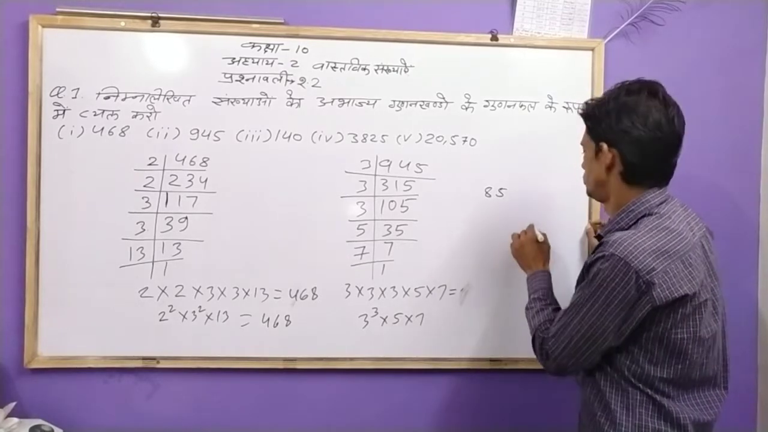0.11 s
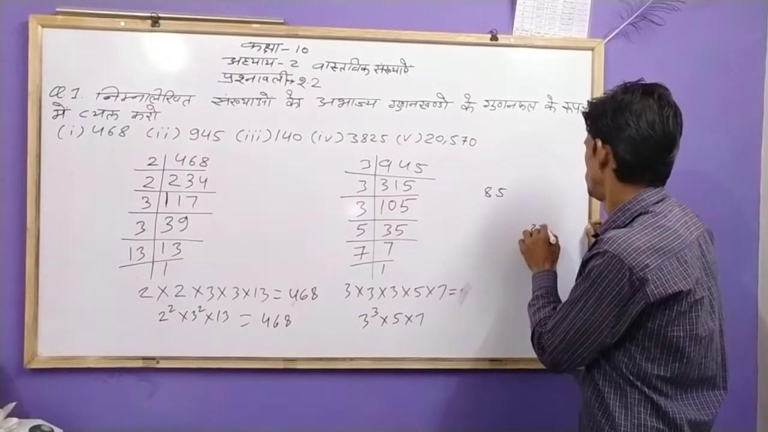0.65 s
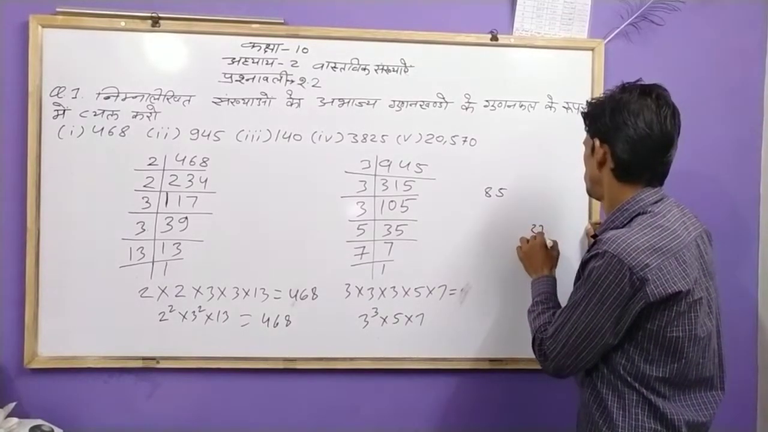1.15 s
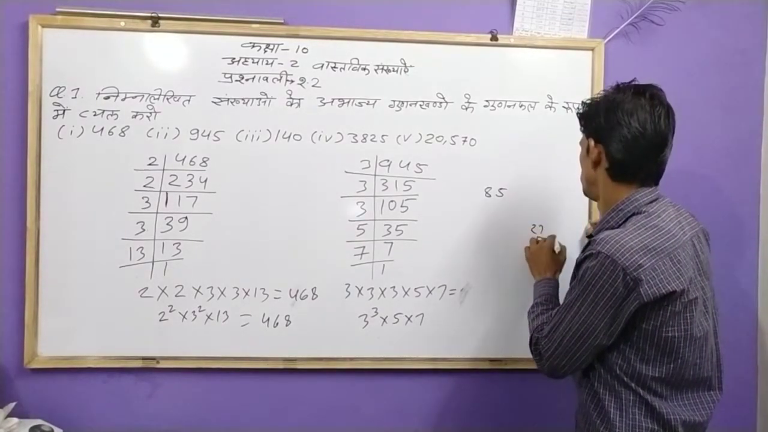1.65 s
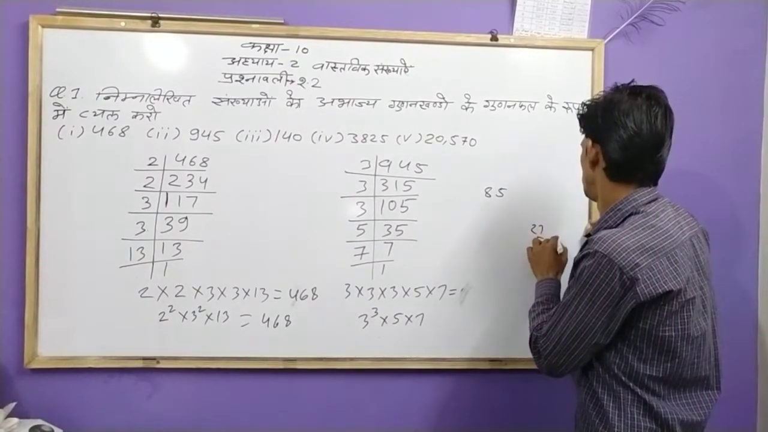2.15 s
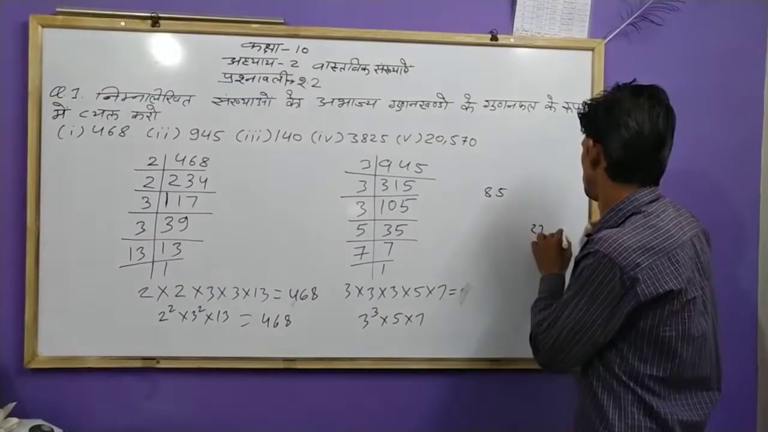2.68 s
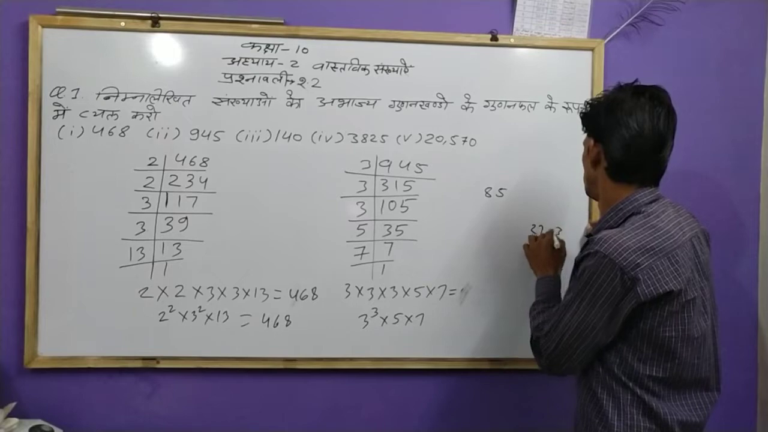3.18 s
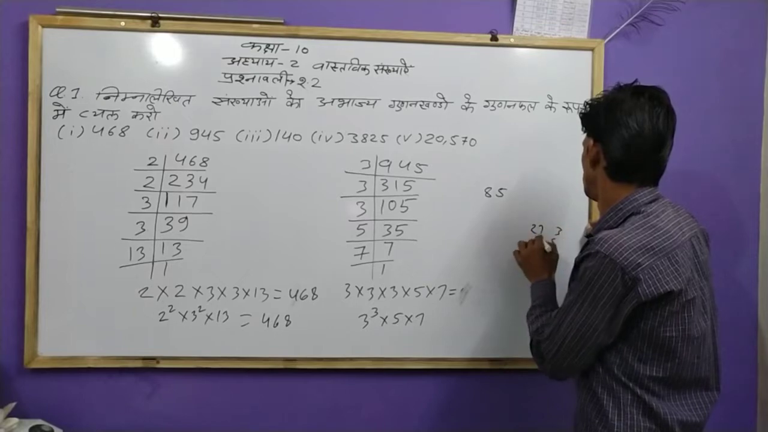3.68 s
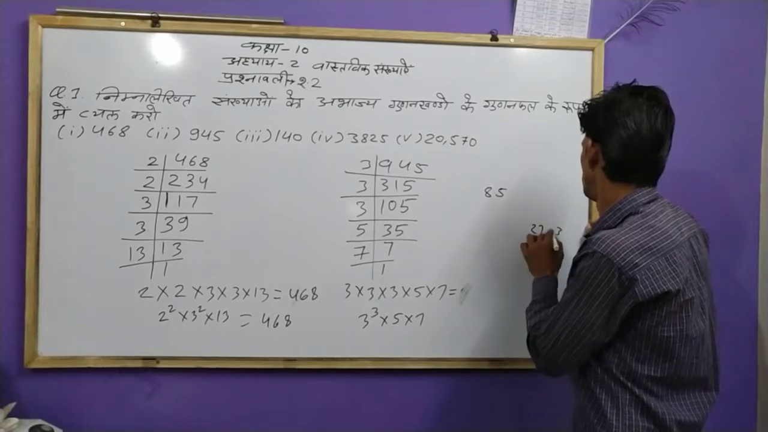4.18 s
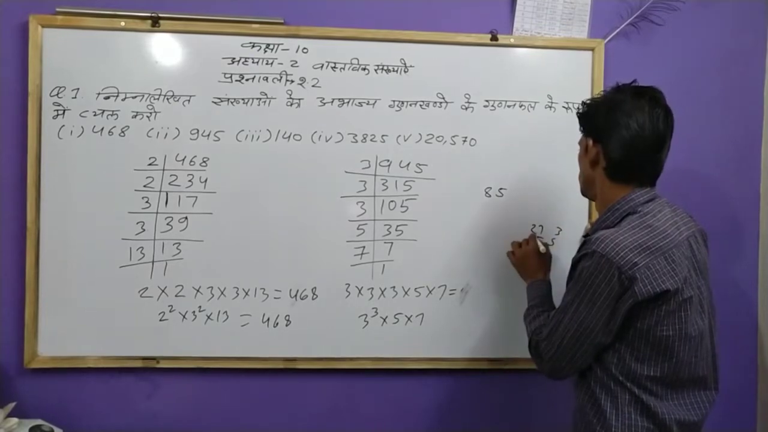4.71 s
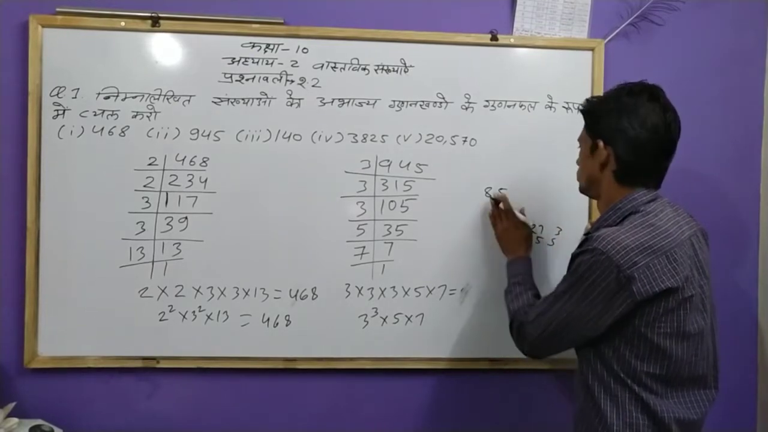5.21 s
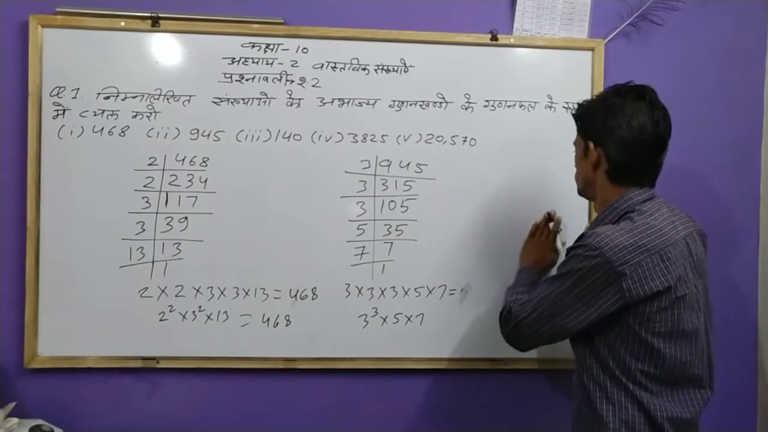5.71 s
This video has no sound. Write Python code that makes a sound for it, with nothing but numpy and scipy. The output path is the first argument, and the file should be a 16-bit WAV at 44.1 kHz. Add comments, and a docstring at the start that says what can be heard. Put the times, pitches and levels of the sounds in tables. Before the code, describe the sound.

One microphone a little way off hears a whiteboard being written on: two strong woody thumps early, two weaker ones, then small hissing felt dashes in clusters and quiet hand bumps. Cloth brushes lightly throughout. Near the end skin rubs the glossy board in quick passes. The hard-walled room adds short hollow reverberation over soft hiss and distant rumble.

```python
"""A felt marker writes on a wall-hung whiteboard in a small bare classroom, heard at one microphone.
Each landing tip bends the board: a dull knock, its reflections and the standing waves of the room.
Felt hiss and scuffs are noise through resonances of the tip; drag tones are narrow noise; hand bumps are
damped low modes. Sleeve rustle and a final wipe are coloured noise in bells of time.
Outside rumble, one deep throb, and room and microphone hiss lie below as coloured noise."""
import sys
import numpy as np
from scipy import signal
from scipy.fft import rfft, irfft, next_fast_len
from scipy.io import wavfile

SR = 44100
rng = np.random.default_rng(int(sys.argv[2]) if len(sys.argv) > 2 else 0)


def log_audio(samples):
    """Write samples as a 16-bit WAV file to the path given in sys.argv[1]."""
    # one column per channel
    frames = np.atleast_2d(samples).T
    # limit to full scale, then quantise
    limited = np.clip(frames, -1, 1)
    pcm = np.round(limited * 32767).astype(np.int16)
    wavfile.write(sys.argv[1], SR, pcm)


def to_linear_factor(level_db):
    """Convert decibel levels (scalar or array-like) to linear amplitude factors."""
    exponent = np.asarray(level_db, float) / 20
    return 10 ** exponent


N = 257764  # samples


def rms_one(x):
    """Scale to rms 1."""
    return x / np.sqrt(np.mean(x ** 2) + 1e-20)


def in_time(rows):
    """Columns of a curve, drawn with straight lines, at every sample."""
    s, *columns = np.transpose(rows)
    return [np.interp(np.arange(N) / SR, s, c) for c in columns]


def drift(rate_hz):
    """Slow chance with spread 1: noise through two equal low-passes, computed every 40 samples."""
    hop, settle = 40, 2000
    r = np.exp(-2 * np.pi * rate_hz * hop / SR)
    white = rng.standard_normal(N // hop + settle + 2)
    slow = rms_one(signal.lfilter([1], [1, -2 * r, r * r], white)[settle:])
    return np.interp(np.arange(N) / hop, np.arange(len(slow)), slow)


def coloured(spectrum, patchy_db, flicker_hz):
    """Noise in third-octave bands, each with its level and its own flicker; rms 1."""
    hz_points, db_points = np.transpose(spectrum)
    octaves = np.log2(hz_points[-1] / hz_points[0])
    edges = hz_points[0] * 2 ** np.arange(0, octaves + 0.3, 1 / 3)
    white = rng.standard_normal((2, N + SR))
    out = 0
    for k, (low, high) in enumerate(zip(edges, edges[1:])):
        band_pass = signal.butter(2, [low, high], "band", fs=SR, output="sos")
        band = signal.sosfilt(band_pass, white[k % 2])[SR:]  # the first second lets the filter settle
        level_db = np.interp(np.log(low * high) / 2, np.log(hz_points), db_points)
        out = out + to_linear_factor(level_db + patchy_db * drift(flicker_hz)) * band
    return rms_one(out)


def ring(force, hz, t60):
    """A damped mode: a unit click sets a sine of height 1 ringing."""
    r, w = to_linear_factor(-60 / (t60 * SR)), 2 * np.pi * hz / SR
    return signal.lfilter([0, np.sin(w)], [1, -2 * r * np.cos(w), r * r], force + 1e-18)


def twice_resonant(x, hz, width_hz, db):
    """Two equal resonances in a row; width and level are those of one of them."""
    r = np.exp(-np.pi * width_hz / SR)
    b = to_linear_factor(db) * (1 - r * r) / 2 * np.array([1, 0, -1])
    a = [1, -2 * r * np.cos(2 * np.pi * hz / SR), r * r]
    return signal.lfilter(b, a, signal.lfilter(b, a, x))


# noise of the room and the microphone: (frequency [Hz], relative level [dB per Hz])
HISS_SPECTRUM = [(180, -19), (300, -8), (470, -15.5), (787, -7), (1210, -10.5), (8000, -16), (15600, -18),
                 (17000, -17)]


def hiss():
    """Steady soft noise of room and microphone, each band flickering slightly."""
    return to_linear_factor(-66.5) * coloured(HISS_SPECTRUM, patchy_db=1.2, flicker_hz=2.3)


# rumble from outside swells and fades: (time [s], level [dB])
RUMBLE_LEVEL = [(0, -56), (0.31, -50), (0.5, -56.5), (0.86, -54.5), (1.15, -58.5), (1.55, -54.5),
                (2.2, -60), (3.2, -57), (3.64, -62), (4.02, -57), (4.35, -61), (4.99, -60), (5.55, -53),
                (5.84, -57)]
# colour of the rumble: (frequency [Hz], relative level [dB per Hz])
RUMBLE_SPECTRUM = [(12, -19), (20, 5), (22, -19), (37, 2.5), (107, -0.5), (145, -2), (173, -3.5), (353, -9),
                   (398, -10.5), (700, -20), (910, -49), (1540, -120)]


def rumble():
    """Low noise from outside the room, following a level curve."""
    level_db, = in_time(RUMBLE_LEVEL)
    return to_linear_factor(level_db) * coloured(RUMBLE_SPECTRUM, patchy_db=2.5, flicker_hz=3.2)


def passes(rows):
    """Each movement is a bell in time for each layer, powers added."""
    t, power = np.arange(N) / SR, 0
    for middle, length, *db in rows:
        bell = np.exp(-2 * (2 * (t - middle) / length) ** 2)
        power = power + to_linear_factor(np.array(db))[:, None] ** 2 * bell
    return np.sqrt(power)


# sleeve and hand move; levels at the middle:
# (middle [s], length [s], rustle [dB], swish [dB], sheen [dB])
SLEEVE_MOVES = [(0.02, 0.37, -63.5, -66, -64.5), (0.18, 0.22, -62, -63, -64.5),
                (0.42, 0.2, -71, -68.5, -68.5), (0.78, 0.3, -71, -69.5, -75), (1.12, 0.27, -86, -75, -67.5),
                (1.37, 0.29, -69.5, -67.5, -68.5), (1.85, 0.22, -71, -76, -78),
                (2.05, 0.41, -73.5, -77, -72), (2.4, 0.16, -66, -70.5, -75), (2.66, 0.23, -65.5, -70, -74),
                (2.77, 0.22, -64, -70, -68), (3.07, 0.57, -65.5, -74, -77), (3.35, .3, -73.5, -91, -86),
                (3.75, 0.47, -94, -72, -69.5), (4.1, 0.1, -61.5, -71, -74), (4.3, 0.11, -67.5, -73, -80),
                (4.5, 0.062, -65.5, -92, -84), (4.78, 0.13, -78, -84, -73)]
# the hand wipes across the board, pass by pass; the same columns
WIPE_PASSES = [(5.04, 0.13, -65, -67, -62), (5.137, 0.14, -60, -67, -59.5), (5.23, 0.15, -59, -55.5, -54.5),
               (5.324, 0.2, -61.5, -64, -61), (5.411, .05, -60, -69, -66), (5.489, 0.18, -59, -60, -57),
               (5.587, .05, -66, -55.5, -59), (5.631, 0.11, -65.5, -55, -53), (5.701, 0.12, -62, -59, -57),
               (5.84, 0.12, -65, -60.5, -55)]
# dull body, then swish and sheen of cloth: (frequency [Hz], relative level [dB per Hz])
CLOTH_BODY = [(240, -40), (400, -1), (741, 6), (1230, -1.5), (1530, 2), (2000, -6.5), (4000, -9),
              (5200, -77), (8800, -120)]
CLOTH_SWISH = [(1900, -15), (2600, 0), (3300, -0.5), (4200, 3.5), (5500, -0.5), (7000, -1.5), (8500, -17)]
CLOTH_SHEEN = [(6000, -19), (8000, -2), (11000, 1), (14000, 0.5), (16500, -5.5)]
# skin on the glossy board: (frequency [Hz], relative level [dB per Hz])
SKIN_SWISH = [(1900, -10), (2700, -2), (3600, -0.5), (4500, 1.5), (5600, -1), (7000, -8), (8500, -21)]
SKIN_SHEEN = [(6000, -5.5), (8000, -8.5), (10500, -4), (13500, -3), (16500, -3)]


def rustle():
    """Cloth and skin rub as coloured noise: dull body, swish and bright sheen; skin flickers fast."""
    cloth = passes(SLEEVE_MOVES)
    skin = passes(WIPE_PASSES) * to_linear_factor(0.72 * drift(41))
    out = (cloth[0] + skin[0]) * coloured(CLOTH_BODY, patchy_db=2.0, flicker_hz=5)
    out += cloth[1] * coloured(CLOTH_SWISH, patchy_db=1.5, flicker_hz=12)
    out += cloth[2] * coloured(CLOTH_SHEEN, patchy_db=1.5, flicker_hz=4)
    out += skin[1] * coloured(SKIN_SWISH, patchy_db=1.5, flicker_hz=10)
    out += skin[2] * coloured(SKIN_SHEEN, patchy_db=0.8, flicker_hz=10)
    return out


# walls facing each other: (round trip [ms], level [dB])
WALLS = [(10.3, -7.5), (13.7, -2.5), (19.1, 4), (23.9, -25), (31.3, 10), (41.9, -9), (57.1, -18)]


def classroom(x):
    """Reflections only: sound runs to and fro between facing walls, duller on every round."""
    room_t60_s, wall_cut_hz = 0.43, 2500
    size = next_fast_len(N + SR)
    hz = np.arange(size // 2 + 1) * SR / size
    response = 0
    for trip_ms, db in WALLS:
        trip_s = trip_ms / 1000
        trip = to_linear_factor(-60 * trip_s / room_t60_s) * np.exp(-2j * np.pi * hz * trip_s)
        trip = trip / (1 + 1j * hz / wall_cut_hz)
        response = response + to_linear_factor(db) * trip / (1 - trip)  # sum of all rounds
    return irfft(rfft(x, size) * response, size)[:N]


# heel of the hand bumps the panel; level before softening:
# (time [s], level [dB], mode [Hz], t60 [s])
BUMPS = [(0.015, -38.5, 133, 0.14), (0.186, -27, 95, 0.07), (1.856, -36, 95, 0.037),
         (2.064, -47, 83.6, 0.12), (2.717, -43, 112, 0.09), (2.742, -38, 94, 0.031),
         (3.8774, -31.5, 105, 0.042), (4.668, -32.5, 94, 0.042), (5.405, -36, 108.6, 0.17),
         (5.409, -45.5, 289, 0.22), (5.443, -35, 86, 0.16), (5.583, -37.5, 78, 0.046),
         (5.655, -49.5, 220, 0.37), (5.69, -49, 135, 0.14)]


def bumps():
    """A soft push rings one low mode, damped by the hand; a low-pass softens it, walls reflect it."""
    out = np.zeros(N)
    for s, db, hz, t60 in BUMPS:
        push = np.zeros(N)
        push[round(s * SR)] = to_linear_factor(db)
        out += ring(push, hz, t60)
    soft = np.exp(-2 * np.pi * 500 / SR)  # low-pass at 500 Hz
    out = signal.lfilter([1 - soft], [1, -soft], out)
    return out + to_linear_factor(-20.0) * classroom(out)


# faint narrow tones while the tip drags: (start [s], end [s], frequency [Hz], level at start [dB])
DRAG_TONES = [(0.214, 0.33, 1214, -66), (1.046, 1.185, 745, -72), (1.305, 1.485, 578, -62.5),
              (1.3, 1.472, 845, -64.5)]


def drag_tones():
    """Noise twice through a narrow resonance, sinking slowly, then let go."""
    out = np.zeros(N)
    for start, end, hz, db in DRAG_TONES:
        tone = rms_one(twice_resonant(rng.standard_normal(N), hz, width_hz=60, db=0))
        held, = in_time([(start - 0.01, 0), (start, 1), (end - 0.04, 0.7), (end, 0)])
        out += tone * to_linear_factor(db) * held
    return out


# resonances of the felt tip, low, middle and high; each is passed twice:
# (frequency [Hz], width of one pass [Hz], level of one pass [dB])
FELT_LOW = [(3020, 550, -2.5), (3490, 450, 0.5), (4100, 680, -2)]
FELT_MIDDLE = [(5050, 760, -0.5), (5500, 550, 0.5), (6100, 1200, -2)]
FELT_HIGH = [(7260, 1250, 1.5), (9600, 1600, -2), (11100, 1200, -1.5), (13000, 2500, -1),
             (15000, 2000, -1.5)]


def sung(peaks):
    """Each resonance of the tip has its own noise, flickering in grains; the sum has rms 1."""
    out = 0
    for hz, width_hz, db in peaks:
        grains = rng.standard_normal(N) * to_linear_factor(2.5 * drift(40))
        out = out + twice_resonant(grains, hz, width_hz, db)
    return rms_one(out)


# felt sliding; levels at the end of the stroke, brightness relative to the hiss:
# (start [s], length [s], hiss [dB], low rasp [dB], brightness [dB])
STROKES = [(0.304, .05, -67.5, -70.5, -4), (0.388, 0.044, -59, -66, -16), (0.668, 0.061, -62.5, -70, -8),
           (1.338, 0.038, -60.5, -64, -4), (1.41, .025, -72, -76, -9), (2.232, 0.072, -72.5, -68, -2),
           (2.321, 0.05, -64, -66.5, -2), (2.38, 0.028, -82, -64, -1), (2.406, 0.024, -66.5, -78, -1),
           (2.851, 0.053, -66.5, -64.5, -14), (2.944, 0.034, -68, -64, 1), (2.986, 0.038, -67, -69, -6),
           (3.066, 0.025, -66, -66, -5)]
# the tip scuffs as it lands or leaves; levels at the start, brightness relative to the hiss:
# (time [s], hiss [dB], brightness [dB], dull scrape [dB], t60 [s])
SCUFFS = [(0.223, -63, -8, -67, 0.13), (0.622, -62, 0, -55.5, 0.27), (0.738, -68.5, 13, -78, 0.047),
          (1.533, -57, 0.5, -59.5, 0.15), (2.786, -87.5, 12, -70, .05)]


def strokes():
    """Felt rubs the board: strokes swell until the tip lifts, scuffs start at once and die away."""
    press_s, lift_s, swell_db = 0.011, 0.006, 4.5
    low, middle, high = sung(FELT_LOW), sung(FELT_MIDDLE), sung(FELT_HIGH)
    out = np.zeros(N)
    for start, length, hiss_db, rasp_db, bright_db in STROKES:
        end = start + length
        touch, = in_time([(start - press_s, 0), (start, to_linear_factor(-swell_db)), (end, 1), (end + lift_s, 0)])
        felt = to_linear_factor(hiss_db) * (middle + to_linear_factor(bright_db) * high)
        out += touch * (felt + to_linear_factor(rasp_db) * low)
    t = np.arange(N) / SR
    scrape = coloured(CLOTH_BODY[2:], patchy_db=2.5, flicker_hz=30)  # without the lowest points
    for s, hiss_db, bright_db, scrape_db, t60 in SCUFFS:
        dying = (t >= s) * to_linear_factor(-60 * np.clip(t - s, 0, 1) / t60)
        felt = to_linear_factor(hiss_db) * (middle + to_linear_factor(bright_db) * high)
        out += dying * (felt + to_linear_factor(scrape_db) * scrape)
    return out + to_linear_factor(-11) * classroom(out)


# standing waves of the room as heard at the microphone; level before the weight:
# (frequency [Hz], level [dB], signed weight)
ROOM_MODES = [(73.3, -29.5, -1), (100.2, -32, -0.92), (156.5, -20.5, -0.61), (176.7, -39.5, -0.83),
              (216.5, -28, -1.23), (224, -17, 0.88), (241.5, -23.5, 1), (263.2, -23, -1.36),
              (296.7, -22.5, -1.08), (325.3, -24, 1), (341.7, -31, -0.67), (351.7, -19.5, -1.2),
              (372.5, -16.5, -1.11), (387.8, -13, 1), (403, -21.5, 1), (442, -18.5, 1), (453, -22, 1),
              (477, -16.5, -1.18), (516, -17.5, -0.82), (585, -16, 0.95), (535, -7.5, -0.78),
              (556, -16.5, 1), (590, -26, 1), (612, -13, 0.85), (613, -22.5, -0.8), (625, -18, -1)]


def standing_waves():
    """Answer of the room to a unit push: decaying modes that build up while the first echoes pass."""
    t = np.arange(SR) / SR
    named_t60_s, build_up_ms = 0.49, (5.5, 25)
    out = 0
    for hz, db, weight in ROOM_MODES:
        out = out + weight * to_linear_factor(db - 60 * t / named_t60_s) * np.cos(2 * np.pi * hz * t)
    # 44 higher modes, scattered in frequency and phase
    crowded_db, crowded_t60_s, low_hz, high_hz = -13, 0.33, 570, 903
    decay = to_linear_factor(crowded_db) * np.exp(-np.log(1000) * t / crowded_t60_s)
    for place, turn in rng.random((44, 2)):
        hz = low_hz + (high_hz - low_hz) * place
        out += decay * np.cos(2 * np.pi * (hz * t + turn))
    return out * np.interp(1000 * t, build_up_ms, [0, 1])


# tip lands on the board; width is the standard deviation of the bell, level that of the direct knock,
# room drive is relative to it: (time [s], peak level [dB], contact width [ms], room drive [dB])
TAPS = [(0.2241, -14, 0.7, 0), (0.6213, -12, 0.61, -1), (1.2683, -23, 0.79, 4), (1.5333, -17.5, 0.73, 2.5),
        (1.8614, -45.5, 1, 15), (2.724, -43, 0.74, -7), (3.8827, -32.5, 0.89, 7.5),
        (4.6729, -40.5, 0.97, 11.5), (5.408, -38.5, 0.78, 6)]
# single reflections of a knock: (delay [ms], share of the knock)
ECHOES = [(3.8, .33), (7.2, .2), (10.25, .6), (12.9, .15), (20.75, .3)]
# barrel of the pen, struck sharply: (frequency [Hz], level relative to the tap [dB], t60 [s])
BARREL = [(1300, -49.5, 0.14), (1480, -55.5, 0.076), (2450, -54, 0.029)]


def taps():
    """A bell-shaped force bends the panel; the air hears its acceleration, the same echoes and modes each time."""
    t = np.arange(N) / SR
    force, knock, tick = np.zeros((3, N))
    for s, db, contact_ms, room_db in TAPS:
        u = np.clip((t - s) / (contact_ms / 1000), -9, 9)
        bell = to_linear_factor(db) * np.exp(-u * u / 2)
        force += to_linear_factor(room_db) * bell * 1000 / SR  # a sum over milliseconds
        knock -= (1 - u * u) * bell  # second derivative of the bell
        tick[round(s * SR)] = to_linear_factor(db)
    out = knock + signal.fftconvolve(force, standing_waves())[:N]
    for delay_ms, share in ECHOES:
        out += share * np.interp(t - delay_ms / 1000, t, knock)
    for hz, db, t60 in BARREL:
        out += to_linear_factor(db) * ring(tick, hz, t60)
    return out


# colour of the deep throb: (frequency [Hz], relative level [dB per Hz])
THROB_SPECTRUM = [(18, -4), (26, 0), (34, -5), (44, -18)]


def throb():
    """A deep throb passes through the building: very low noise sets in quickly, sinks a little and fades."""
    start, rise_s, hold_s, fade_s = 2.97, 0.065, 0.3, 0.33
    full = start + rise_s
    held = full + hold_s
    swell, = in_time([(start, 0), (full, 1), (held, 0.75), (held + fade_s, 0)])
    return to_linear_factor(-57) * swell * coloured(THROB_SPECTRUM, patchy_db=2.5, flicker_hz=3)


def scene():
    """All sources at one microphone."""
    background = hiss() + rumble() + throb()
    hand = rustle() + bumps()
    pen = drag_tones() + strokes() + taps()
    return (background + hand + pen)[None]


def roll_off(x):
    """The treble ends steeply here."""
    return signal.sosfilt(signal.butter(12, 15600, fs=SR, output="sos"), x)


def record(dry):
    """The converter adds a small constant offset."""
    mix = dry + 0.00081
    return roll_off(mix)


dry = scene()
out = record(dry)
log_audio(out)
```